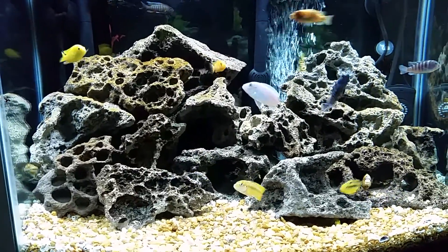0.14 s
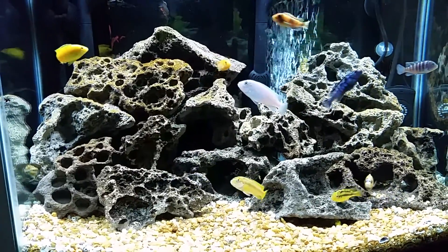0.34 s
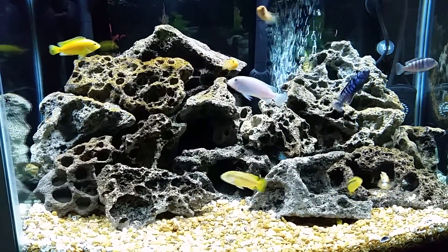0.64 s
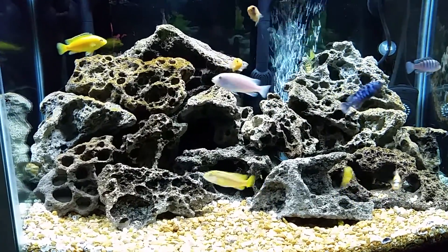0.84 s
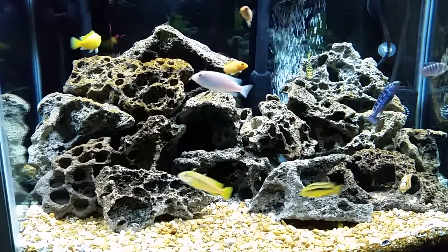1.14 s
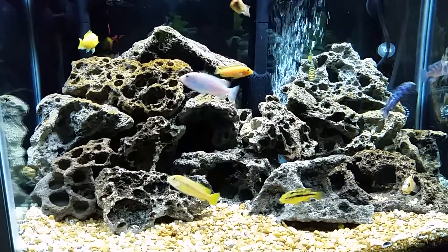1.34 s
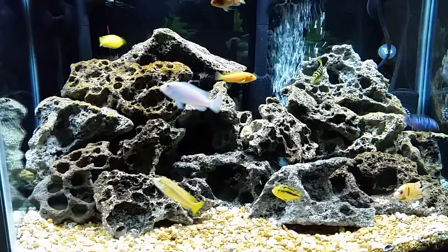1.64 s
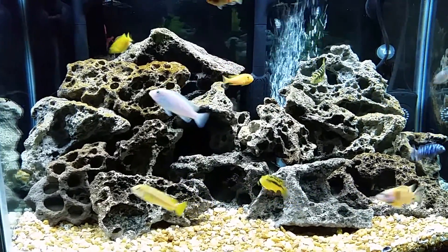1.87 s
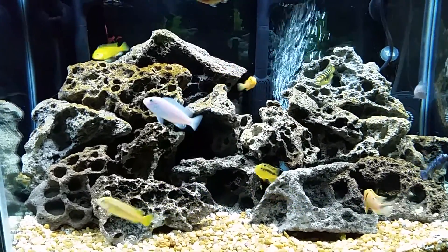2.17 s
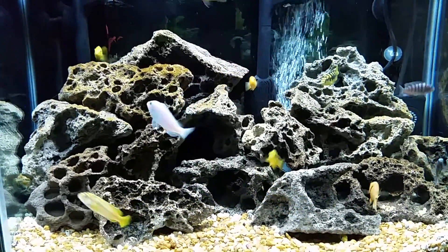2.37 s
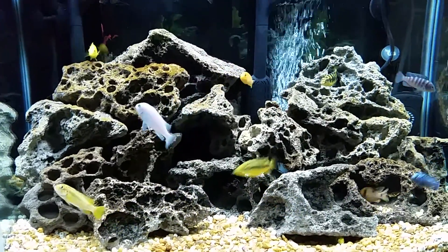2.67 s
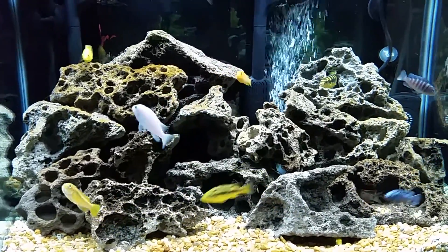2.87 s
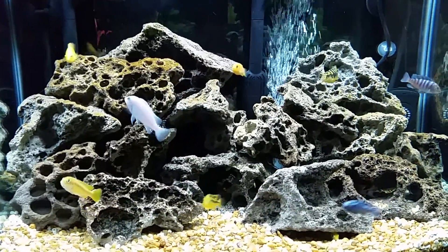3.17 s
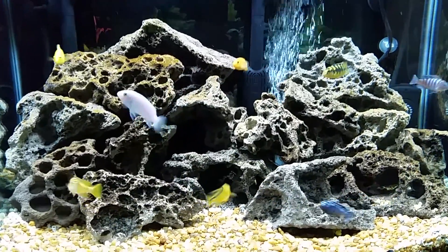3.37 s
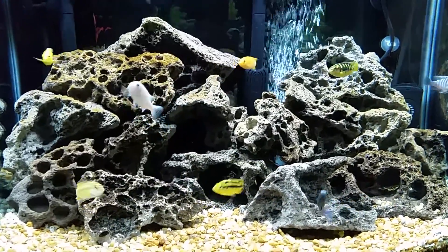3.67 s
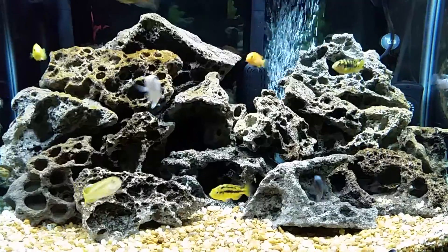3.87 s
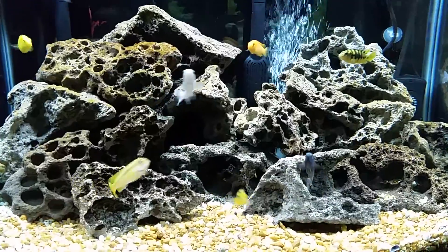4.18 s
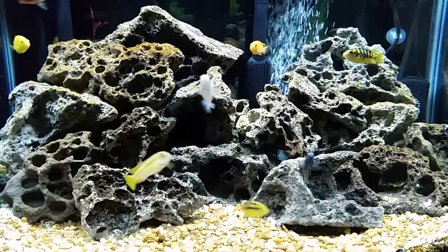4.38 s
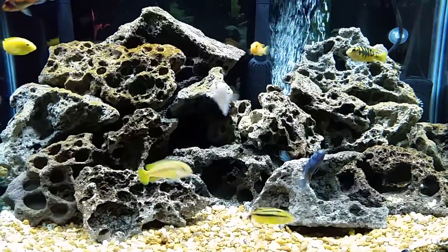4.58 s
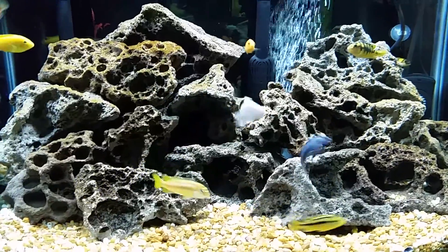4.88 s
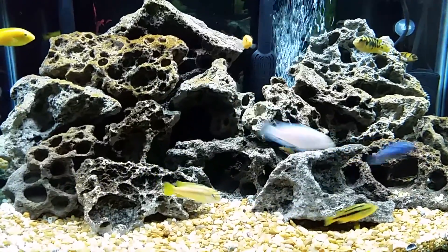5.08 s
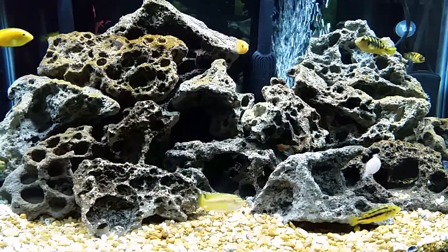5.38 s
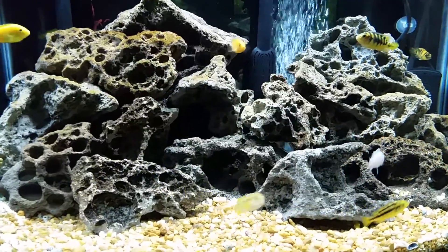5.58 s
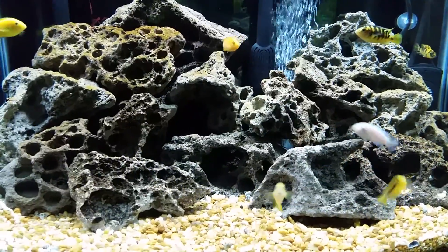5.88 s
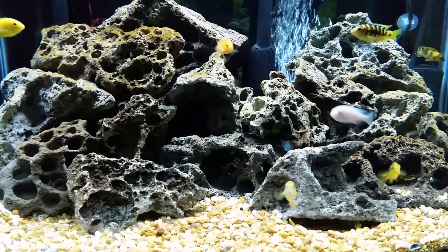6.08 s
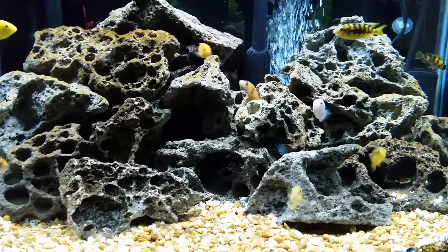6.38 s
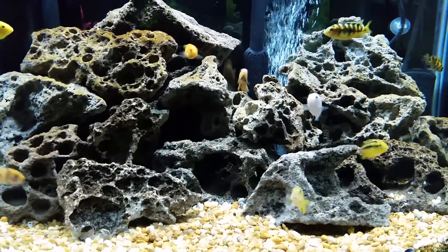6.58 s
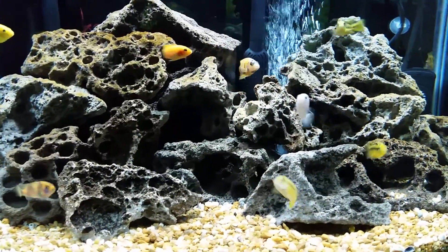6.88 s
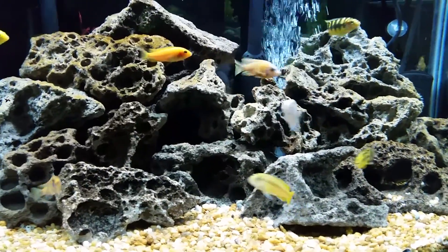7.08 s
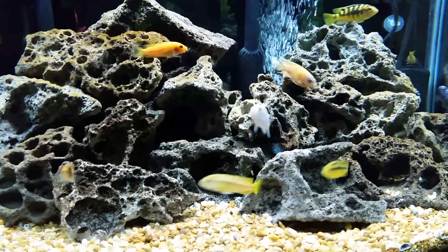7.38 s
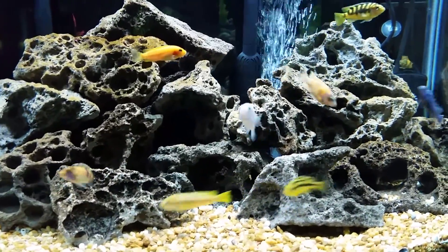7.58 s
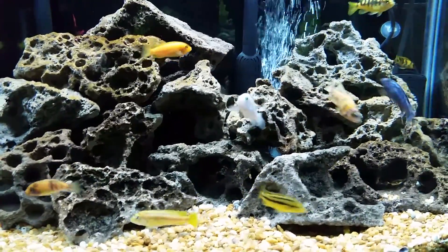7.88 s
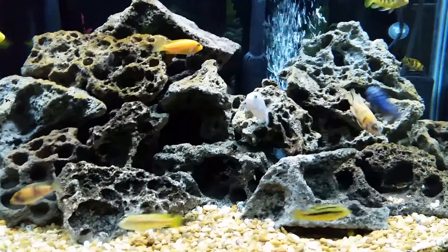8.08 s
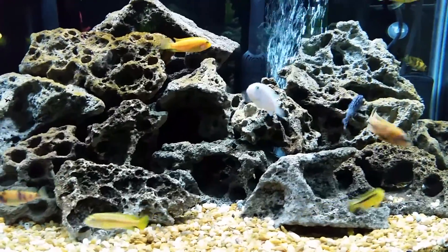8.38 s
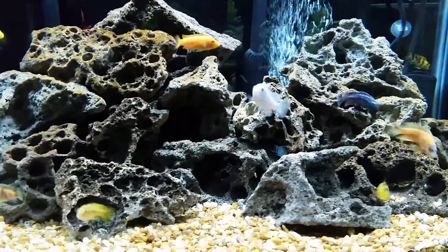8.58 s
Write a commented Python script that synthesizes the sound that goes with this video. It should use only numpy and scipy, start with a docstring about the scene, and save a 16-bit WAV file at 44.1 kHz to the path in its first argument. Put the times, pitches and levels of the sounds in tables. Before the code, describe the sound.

Water burbles and glugs in a fish tank over a low pump hum, while fingers occasionally bump a hand-held microphone.

```python
"""A low hum and rushing water come first: an aquarium pump runs on mains power in a quiet room.
The moving water rings in the tank, burbles and glugs, with a fine, very high fizz on top.
A faint whistle passes at the start, and later a few pockets of air plop at the surface.
Fingers shift on a hand-held microphone's case: soft thumps, then a short creak that ends in a pop."""
import sys
import numpy as np
from scipy import signal
from scipy.fft import rfft, irfft
from scipy.io import wavfile
from scipy.ndimage import uniform_filter1d

SR = 44100
rng = np.random.default_rng(int(sys.argv[2]) if len(sys.argv) > 2 else 0)


def store_pcm(level_fs):
    """Save levels as 16-bit WAV."""
    pcm = np.round(np.clip(level_fs, -1, 1) * 32767).astype(np.int16)
    wavfile.write(sys.argv[1], SR, np.atleast_2d(pcm).T)


N = 384993
TIME = np.arange(N) / SR
FREQS = np.fft.rfftfreq(N, 1 / SR)

# The tone of the high hiss in both the fizz and the creak. Columns: pitch_hz, relative_db
HISS_TONE = [(7000, -56), (9000, -44.5), (10200, -32), (11500, -18.5), (13000, -8), (14400, 1.5),
             (15800, -6)]


def from_db(db):
    """Turn decibels into a number to multiply a sound by."""
    return 10 ** (np.asarray(db) / 20)


def gains(points):
    """Join (pitch_hz, level_db) points into a strength for every frequency."""
    hz, db = np.transpose(points)
    return from_db(np.interp(np.log(FREQS + 1), np.log(hz), db))


def over_time(points):
    """Join (time_s, level_db) points with straight lines."""
    return np.interp(TIME, *np.transpose(points))


def noise(gain):
    """Noise with the given strength at each frequency."""
    return irfft(rfft(rng.standard_normal(N)) * gain, N) * np.sqrt(SR / 2)


def drift(rate_hz):
    """A random wobble around 0, with a typical size of 1."""
    wobble = noise(1 / (1 + (FREQS / rate_hz) ** 2))
    return (wobble - wobble.mean()) / wobble.std()


def ringing(resonances):
    """Noise that rings near each (pitch_hz, width_hz, level_db) row."""
    peaks = (from_db(db) / (1 + 2 * ((FREQS - hz) / width) ** 2) for hz, width, db in resonances)
    return noise(np.sqrt(sum(peak ** 2 for peak in peaks)))


def blip(middle_s, half_length_s, hz, db, fall_hz_per_s=0):
    """A brief tone that swells and fades; its pitch can fall."""
    t = TIME - middle_s
    swell = np.exp(-2 * (t / half_length_s) ** 2)
    cycles = hz * t - fall_hz_per_s * t ** 2 / 2 + rng.random()
    return from_db(db) * np.sqrt(2) * swell * np.sin(2 * np.pi * cycles)


def keep_side(x, hz, side, order=2):
    """Keep the "low" or "high" side of hz; a higher order cuts more sharply."""
    return signal.sosfilt(signal.butter(order, hz, side, fs=SR, output="sos"), x)


def push(length_s):
    """One smooth push, then rest."""
    return np.sin(np.pi * np.minimum(TIME[:SR // 10] / length_s, 1)) ** 2


def play(events, shape):
    """Play the shape at every (start_s, peak_db) event."""
    hits = np.zeros(N)
    for start_s, db in events:
        hits[round(start_s * SR)] += from_db(db)
    return signal.oaconvolve(hits, shape / np.abs(shape).max())[:N]


def pump(mains_hz=59.993, waver_db=0.68, upper_waver_db=2.0, buzz_waver_db=1.5, fade_db_per_s=0.45):
    """The pump's arm swings with the mains; the changing load sways its higher tones most."""
    # The tones in the hum. Columns: mains_multiple, level_db
    hum_tones = [(1, -43), (2, -38.5), (3, -53.0), (4, -57), (6, -55), (7, -66), (8, -60.5), (9, -63),
                 (10, -65), (11, -72.5), (12, -71), (13, -75.5), (14, -63), (16, -75), (19, -76), (20, -76),
                 (21, -73.5), (23, -78), (24, -90), (26, -94.5)]
    hum, load = np.zeros(N), drift(1.7)
    for (multiple, db), phase in zip(hum_tones, rng.uniform(0, 2 * np.pi, len(hum_tones))):
        sway_db = waver_db * load + upper_waver_db * multiple / 20 * drift(2.5)
        if multiple == 14:   # this buzzing tone wavers more and slowly fades
            sway_db += buzz_waver_db * drift(3) - fade_db_per_s * (TIME - TIME.mean())
        tone = np.sqrt(2) * np.sin(2 * np.pi * mains_hz * multiple * TIME + phase)
        hum += from_db(db + sway_db) * tone
    return hum


def water(treble_hz=1800, rush_sway_db=0.65, ring_sway_db=1.0):
    """Swirling water makes a dull rush, and the tank rings along with it."""
    # The tone of the rushing flow. Columns: pitch_hz, level_db (in a band 1 Hz wide)
    rush_tone = [(15, -80), (45, -81), (120, -71), (200, -71.5), (265, -78.5), (480, -77.5), (760, -85),
                 (1050, -87.5), (1500, -94), (1750, -99), (2600, -109), (5200, -119), (8200, -136),
                 (16000, -145)]
    # How the rush's treble slowly wanders. Columns: time_s, relative_db
    treble_levels = [(0, 1), (2.8, 0.8), (3.3, 2), (4.1, .4), (7.6, 0.05), (8.7, .8)]
    # Where the tank and its hood ring. Columns: pitch_hz, width_hz, level_db (in a band 1 Hz wide)
    tank_rings = [(309.8, 30, -71), (353, 26, -74), (699, 36, -81), (865, 48, -83), (1536, 27, -94.5)]
    low_share = 1 / (1 + (FREQS / treble_hz) ** 8)
    low = noise(gains(rush_tone) * np.sqrt(low_share))
    treble = noise(gains(rush_tone) * np.sqrt(1 - low_share)) * from_db(over_time(treble_levels))
    rush = (low + treble) * from_db(rush_sway_db * drift(11))
    return rush + ringing(tank_rings) * from_db(ring_sway_db * drift(5.4))


def burble(sway_db=1.3, sway_hz=6):
    """A hollow burble grows and shrinks as the water churns."""
    # Hollow ringing in the churning water. Columns: pitch_hz, width_hz, relative_db
    hollow_rings = [(515.6, 15, -5), (546.7, 22, 1), (586.7, 24, 0)]
    # How strongly the water churns. Columns: time_s, level_db
    churn_levels = [(0, -52), (.7, -49.3), (1.5, -51.5), (2.2, -49.8), (2.75, -53), (3.3, -49.7),
                    (4.3, -51), (5.0, -48.8), (5.4, -53), (5.95, -53.5), (6.6, -50), (7.7, -52),
                    (8.7, -50.3)]
    tone = ringing(hollow_rings)
    tone /= np.sqrt(uniform_filter1d(tone ** 2, size=SR // 8))   # even out the loudness
    return tone * from_db(over_time(churn_levels) + sway_db * drift(sway_hz))


def fizz(trim_db=-0.8, flutter_db=0.5, grain_db=1.5, spurts_per_s=26, rise_s=0.006):
    """A fine, grainy hiss with many tiny random spurts and a few stronger flares."""
    # The strength of the steady fizz, before trim_db is added. Columns: time_s, level_db
    fizz_levels = [(0, -60.5), (2.2, -61), (3.6, -62), (5.2, -60.5), (6.8, -59.5), (7.3, -61.5),
                   (8.7, -59.5)]
    # The strongest flares. Columns: start_s, peak_db (above the steady fizz)
    flares = [(0.3067, 6), (0.9742, 6), (2.692, 3), (3.6446, 2), (4.0496, 6), (5.1856, 6), (5.566, 4),
              (6.4722, 2), (6.784, 2), (6.9646, 2)]
    steady = from_db(flutter_db * drift(35) + grain_db * drift(900))
    chance, size = rng.random(N), rng.standard_normal(N)
    spurt_db = -4.5 + 2.5 * np.minimum(size, 2)   # compared with the steady fizz
    spurts = [(i / SR, spurt_db[i]) for i in np.flatnonzero(chance < spurts_per_s / SR)]
    t = TIME[:SR // 2]
    burst = t * np.exp(-t / rise_s)
    flicker = np.sqrt(steady ** 2 + play(spurts, burst) ** 2 + play(flares, burst) ** 2)
    hiss = noise(gains(HISS_TONE))
    return from_db(trim_db + over_time(fizz_levels)) * flicker * hiss / hiss.std()


def whistle():
    """Something whistles faintly for a moment."""
    # One thin tone. Columns: middle_s, half_length_s, pitch_hz, level_db
    thin_tone = (.075, .12, 1477, -62.5)
    return blip(*thin_tone)


def glugs(half_length_s=0.017, pitch_hz=554.6):
    """Now and then a larger bubble glugs in the outflow."""
    # The larger bubbles. Columns: middle_s, level_db
    bubbles = [(.178, -43), (.89, -40), (1.035, -43), (1.85, -44.5), (2.19, -44), (2.705, -48), (3.81, -43),
               (4.048, -47), (5.25, -42.5), (5.75, -44), (5.835, -45), (5.95, -42), (6.32, -45),
               (6.935, -41.5), (8.24, -45), (8.6, -42.5)]
    return sum(blip(middle_s, half_length_s, pitch_hz, db) for middle_s, db in bubbles)


def thumps(spring_hz=70):
    """A fingertip presses the case, which springs back; longer touches sound duller."""
    # Finger touches on the case. Columns: start_s, peak_db, contact_s
    touches = [(2.263, -21, 0.0056), (4.3427, -26, 0.0069), (5.2614, -23, 0.005), (6.709, -34, 0.0079),
               (7.2527, -25, 0.0085), (7.31, -25, 0.0071), (7.3641, -26.5, 0.0068), (7.427, -32, 0.01),
               (7.4843, -25, 0.006), (7.7142, -26.5, 0.0061), (7.7847, -36, 0.0076)]
    return sum(play([(start_s, db)], keep_side(push(contact_s), spring_hz, "high"))
               for start_s, db, contact_s in touches)


def plops(half_length_s=0.012, fall_hz_per_s=3500):
    """Pockets of air plop at the surface, each falling in pitch."""
    # The air pockets. Columns: middle_s, pitch_hz, level_db
    pockets = [(5.978, 1350, -54), (6.02, 1290, -56.5), (6.426, 866, -45.5), (6.425, 1340, -55)]
    return sum(blip(middle_s, half_length_s, hz, db, fall_hz_per_s) for middle_s, hz, db in pockets)


def strain_db(elapsed_s, full_db=-22.5, rise_db=14, rise_s=0.015):
    """The strain on the case sets the creak's strength: it builds, then holds."""
    return full_db - rise_db * np.clip(1 - elapsed_s / rise_s, 0, 1)


def case_body(x, low_hz=150, high_hz=1500):
    """The body of the case passes only the duller part of a sound."""
    return keep_side(keep_side(x, high_hz, "low", order=4), low_hz, "high")


def creak(start_s=8.022, end_s=8.0525, gap_s=0.0018, scatter_db=7, ring_hz=14400, ring_s=0.00022):
    """Uneven slips, and the rubbing between them, ring the case very high and nudge its body."""
    # Two hard slips as the case gives way. Columns: start_s, peak_db
    last_slips = [(8.052, -17), (8.0547, -17)]
    times = start_s + gap_s * np.cumsum(1 + rng.uniform(-.5, .5, size=60))
    weakening_db = scatter_db * (1 - np.minimum(rng.standard_normal(len(times)), 1))
    levels = strain_db(times - start_s) - weakening_db
    events = [(s, db) for s, db in zip(times, levels) if s < end_s] + last_slips
    t = TIME[:SR // 10]
    ring = (t / ring_s) ** 2 * np.exp(-2 * t / ring_s) * np.sin(2 * np.pi * ring_hz * t)
    tick = keep_side(ring, 12500, "high", order=6)
    nudge = case_body(push(length_s=0.00026))
    slips = play(events, tick) - from_db(-19) * play(events, nudge)
    hiss, scrape = noise(gains(HISS_TONE)), case_body(noise(1))
    rubbing = hiss / hiss.std() + from_db(-8) * scrape / scrape.std()
    rubbing *= from_db(strain_db(TIME - start_s) - 16.5)   # softer than the slips
    return slips + rubbing * (TIME > start_s) * (TIME < end_s)


def pop(contact_s=0.00075, rebound_s=0.0031, rebound_db=-3, snap_db=-18.5):
    """The case lets go: a hard push, a faint snap and a slower swing back."""
    # The moment it lets go. Columns: start_s, peak_db
    release = [(8.0542, -16)]
    snap = keep_side(push(length_s=0.00008), 6800, "low", order=6)
    snap = from_db(snap_db) * keep_side(snap, 3100, "high")
    rebound = from_db(rebound_db) * keep_side(push(rebound_s), 30, "high", order=1)
    recoil = np.roll(snap + rebound, round(contact_s * SR / 2))   # starts at the top of the push
    return play(release, push(contact_s) - recoil)


def scene():
    """The tank and the finger noises reach one microphone."""
    tank = pump() + water() + burble() + glugs() + plops() + whistle() + fizz()
    return (tank + thumps() + creak() + pop())[None]


def record(dry, cutoff_hz=15900):
    """The very highest treble is cut off sharply."""
    return signal.sosfilt(signal.ellip(12, .1, 80, cutoff_hz, fs=SR, output="sos"), dry)


dry = scene()
out = record(dry)
store_pcm(out)
```